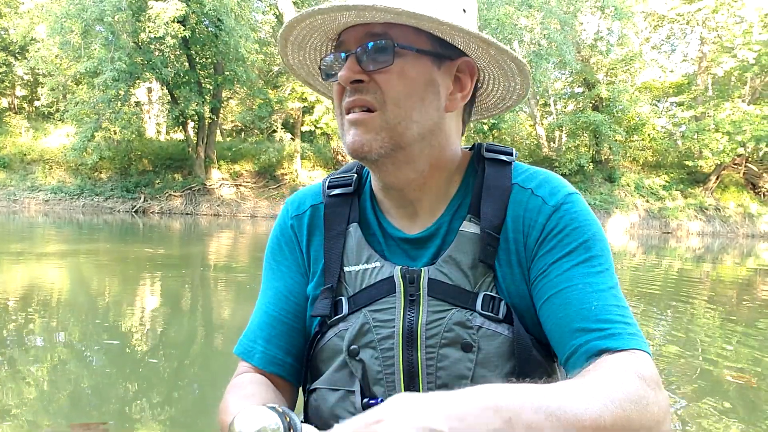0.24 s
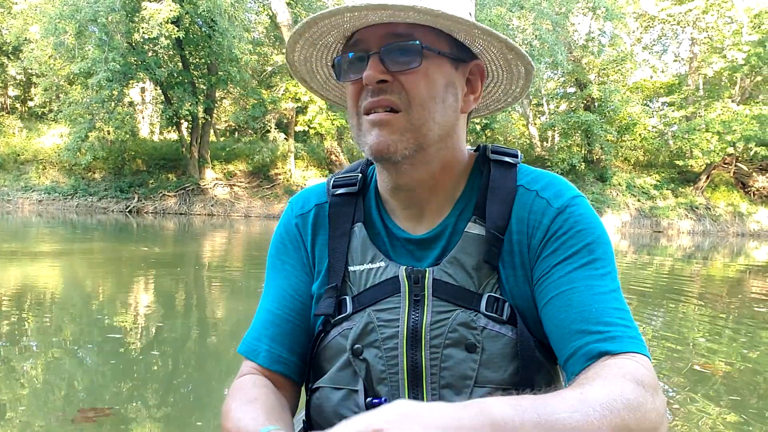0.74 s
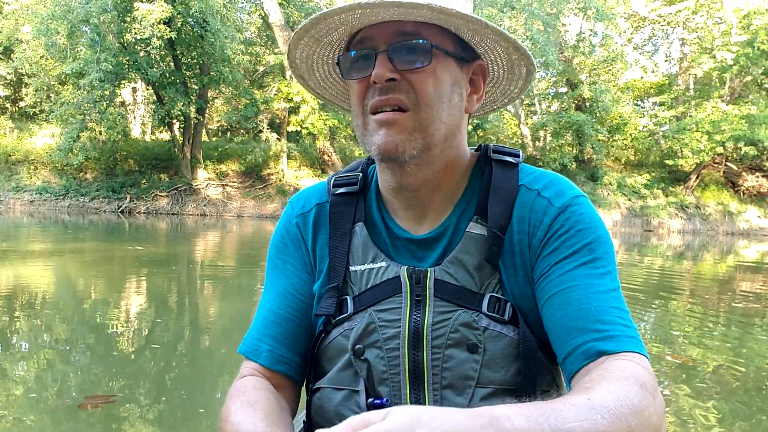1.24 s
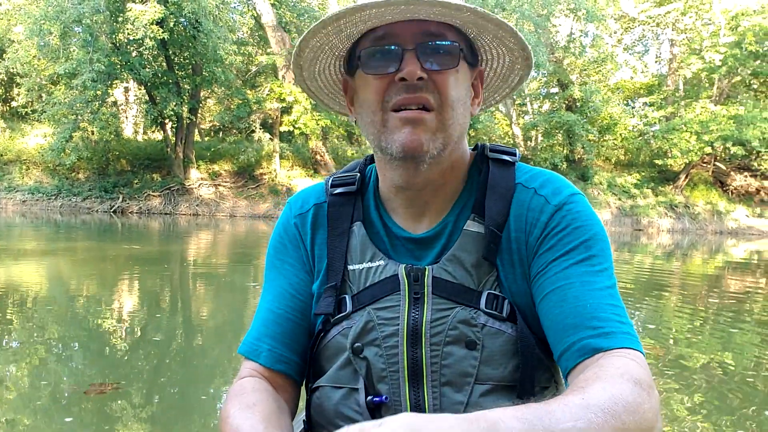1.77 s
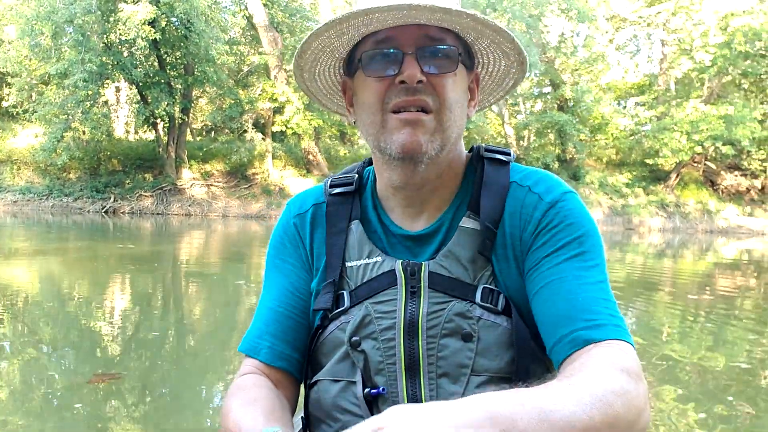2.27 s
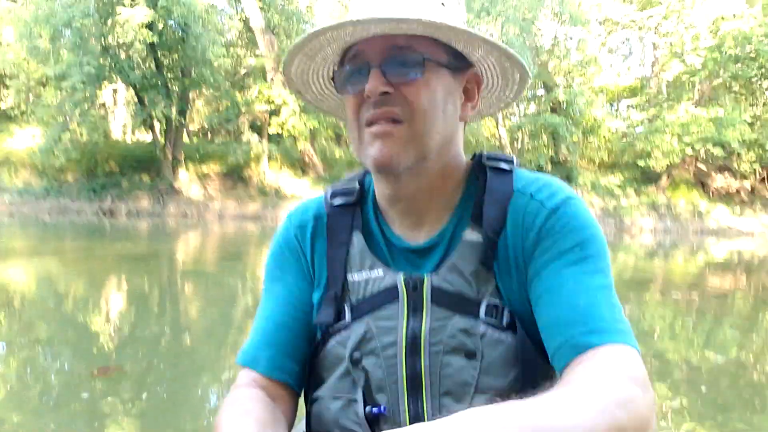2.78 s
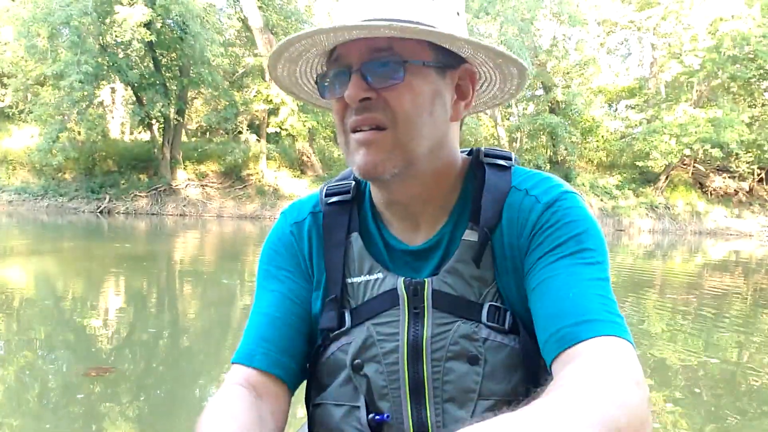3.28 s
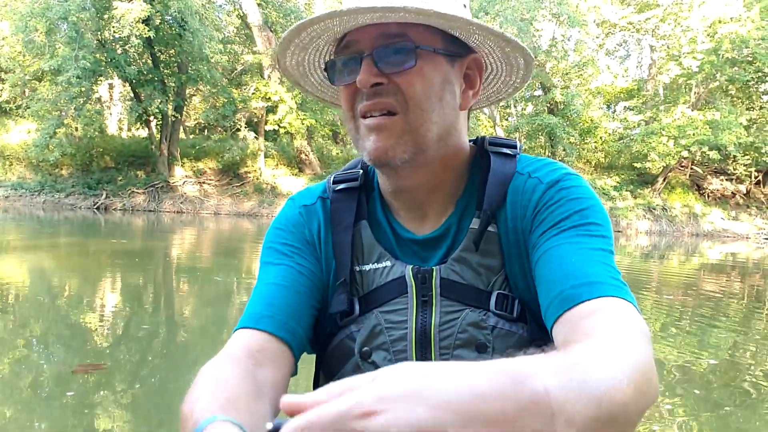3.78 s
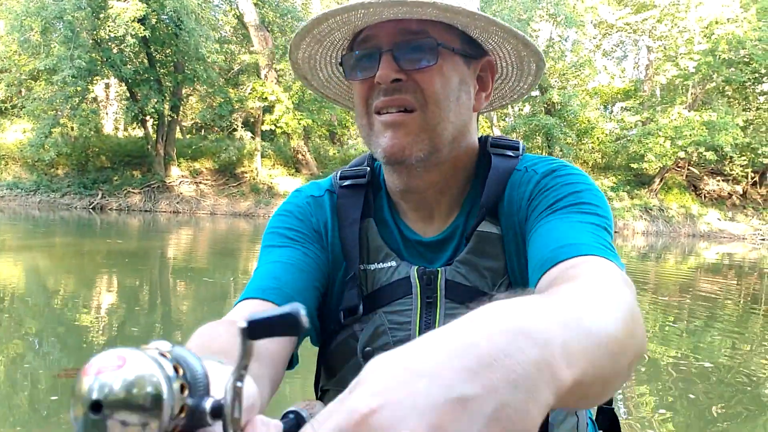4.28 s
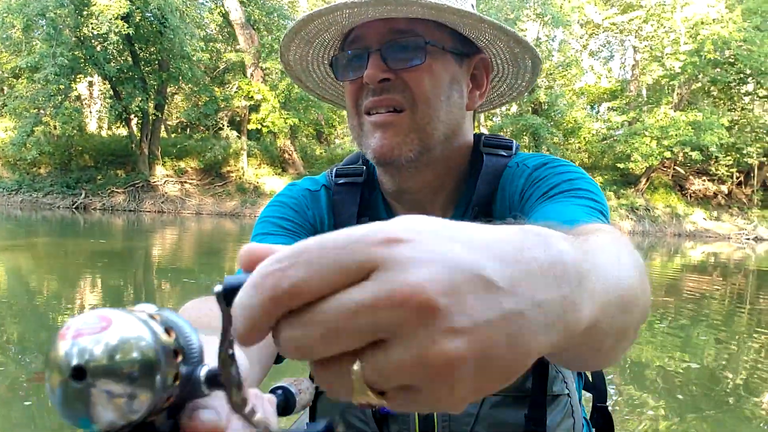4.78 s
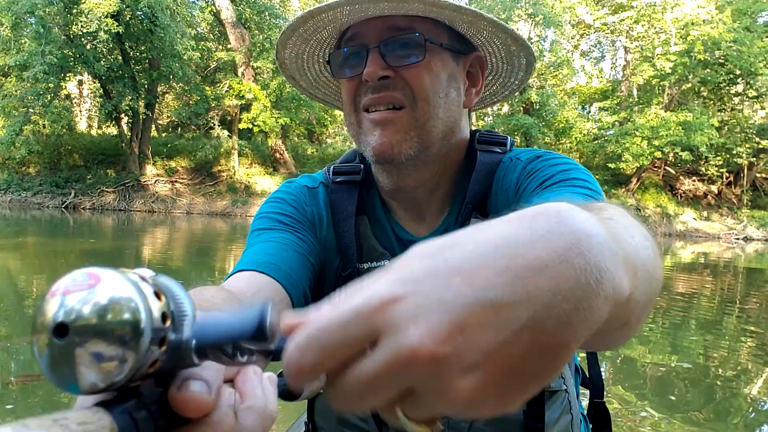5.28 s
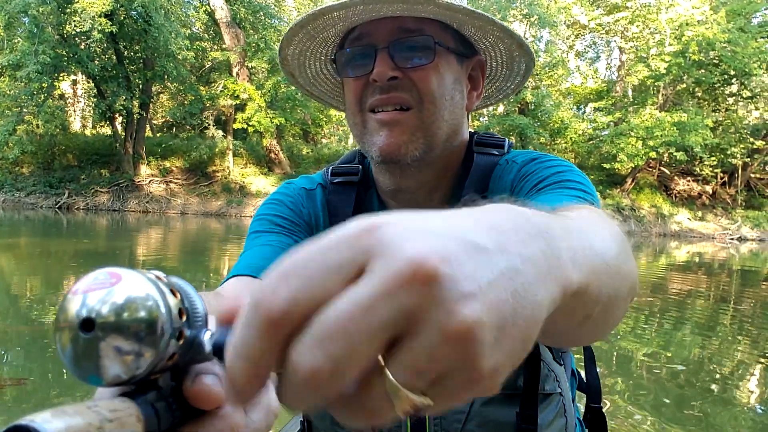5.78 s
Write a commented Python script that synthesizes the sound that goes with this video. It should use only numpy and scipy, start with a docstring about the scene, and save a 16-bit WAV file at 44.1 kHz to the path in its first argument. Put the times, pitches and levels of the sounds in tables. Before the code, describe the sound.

Outdoors on a quiet river, katydids tick and buzz very high and bright over a cricket band and low rumble. After nearly three seconds a plastic canoe hits the bank with a loud, deep hollow boom, then grinds, crackles and knocks for half a second. Softer knocks dwindle, and insects return to the fore with a barely audible reel. The small stereo camera rides on the hull.

```python
"""A muddy, rooty bank with tall grass: a plastic canoe runs aground, booms, grinds, knocks and settles.
Hull modes rung by blows, noise through those modes and a wavering low tone make the hull; bursts of noise
make twigs, gravel and scuffs, and a reel whirs and clunks faintly. Katydids tick and buzz in pulsed bright
noise on the right, and hiss farther off as a fluttering band; crickets hold a narrow band over a low outdoor
rumble. A small camera with two microphone ports rides on the hull."""
import sys
import numpy as np
from scipy import signal
from scipy.fft import rfft, irfft, next_fast_len
from scipy.io import wavfile
from scipy.ndimage import uniform_filter1d, minimum_filter1d, map_coordinates

SR = 44100
rng = np.random.default_rng(int(sys.argv[2]) if len(sys.argv) > 2 else 0)


def master_out(mix):
    """Clip the mix to full scale and print it as 16-bit PCM to the path in sys.argv[1]."""
    frames = np.transpose(np.atleast_2d(mix))
    ceiling = np.clip(frames, -1, 1)
    pcm = np.round(ceiling * 32767).astype(np.int16)
    wavfile.write(sys.argv[1], SR, pcm)


N = 265923

# modes of the plastic hull: (f/Hz, relative level/dB, nominal t60/s)
HULL_MODES = [(45.3, 0.5, 0.33), (61.5, 2, 0.53), (98.8, 2, 0.24), (129.6, -4.5, 0.19), (150, -1.5, 0.37),
              (190.8, 5, 0.12), (240, 2, 0.045), (294.4, 4, 0.04), (345, 1, 0.045), (432, -7, 0.073),
              (508.4, -4.5, 0.051), (569.6, -5, 0.038), (666, -8, 0.033), (780, -11.5, 0.041),
              (933, -16, 0.054), (1136, -8, 0.022), (1507, -8.5, 0.024), (1780, -11.5, 0.037),
              (2320, -17.5, 0.018)]


def amp(db):
    """dB to gain."""
    return 10 ** (np.asarray(db) / 20)


def unit(x):
    """Scaled to rms 1."""
    return x / np.sqrt(np.mean(x ** 2) + 1e-20)


def along(points, hz):
    """Values of (f/Hz, value) points, read along a log frequency axis."""
    f, v = np.transpose(points)
    return np.interp(np.log(hz + 1), np.log(f + 1), v)


def curves(rows):
    """One value per sample for each column after the time."""
    s, *cols = np.transpose(rows)
    return [np.interp(np.arange(N) / SR, s, c) for c in cols]


def sides(pan_db):
    """Left and right gains; positive pan leans left."""
    return amp(np.array([pan_db / 2, -pan_db / 2]))


def wobble(rate):
    """A smooth random curve, rate knots a second."""
    knots = rng.standard_normal(int(N * rate / SR) + 4)
    return map_coordinates(knots, [np.arange(N) * rate / SR])


def filtered(x, response):
    """x shaped by a response of frequency."""
    m = next_fast_len(x.shape[-1] + 8192)
    spectrum = rfft(x, m) * response(np.fft.rfftfreq(m, 1 / SR))
    return irfft(spectrum, m)[..., :x.shape[-1]]


def rush(gain, grain_db=0):
    """Stereo noise of rms 1, alike in the bass; grain_db makes it crackle."""
    # left-right likeness: (f/Hz, correlation)
    likeness = [(60, 0.9), (130, 0.78), (290, 0.5), (640, 0.037), (1400, 0.00475)]
    pair = rng.standard_normal((2, N)) * amp(grain_db * wobble(700))
    turn = lambda hz: np.arccos(np.clip(along(likeness, hz), -1, 1)) / 2
    mid, side = filtered(pair, lambda hz: gain(hz) * [np.cos(turn(hz)), np.sin(turn(hz))])
    return unit(np.array([mid + side, mid - side]))


def shaped(points):
    """Gain of a spectrum table."""
    return lambda hz: amp(along(points, hz))


def add(out, s, sound):
    """Mix a short stereo sound in at time s."""
    part = out[:, round(s * SR):][:, :sound.shape[1]]
    part += sound[:, :part.shape[1]]


def air():
    """Distant rumble and leaf hiss: broad noise weighted to the bass, its level drifting."""
    # outdoor floor: (f/Hz, relative level per Hz/dB)
    floor = [(15, -43), (25, -16), (86, 1), (119, -4), (136, -17.5), (211, -9.5), (253, -13.5), (553, -21),
             (1180, -28.5), (3970, -37), (6000, -35.5), (7800, -51), (13200, -120)]
    # its loudness: (t/s, level/dB)
    loudness = [(0, -55.5), (1.2, -56.5), (2.6, -54), (6.03, -55.5)]
    level_db, = curves(loudness)
    return amp(level_db + 1.3 * wobble(9)) * rush(shaped(floor))


def crickets():
    """Many far trills blur into one fluttering band of noise."""
    # loudness: (t/s, level/dB)
    loudness = [(0, -40), (2.69, -40), (3.31, -42), (4.65, -41.5), (5.59, -40)]
    # trill band: (f/Hz, relative level per Hz/dB)
    trill = [(3410, -62), (5800, -23.5), (5910, -79), (6430, -16.5), (6650, -6), (7310, 4.5), (7840, 4.5),
             (8500, -7.5), (9000, -40), (11700, -38), (19800, -120)]
    level_db, = curves(loudness)
    flutter_db = 0.84 * wobble(11) + 0.77 * wobble(90)
    return amp(level_db + flutter_db) * sides(0.225)[:, None] * rush(shaped(trill))


def far_katydids():
    """A distant chorus: bright noise whose level flutters separately on each side."""
    # loudness and place: (t/s, level/dB, pan/dB)
    chorus = [(0, -30, 2.5), (.5, -33, 2), (.86, -29.5, 0), (1.65, -29, -0.5), (1.86, -34.5, 3.5),
              (2.35, -34.5, 5), (2.82, -30.5, 0), (3.06, -34, 2), (3.58, -31, .5), (4.4, -33.5, -1),
              (4.73, -37.5, 5.5), (5.73, -28.5, 1.5), (6.03, -31, 7)]
    # chorus band: (f/Hz, relative level per Hz/dB)
    far_band = [(5180, -44), (8800, -12), (10300, -6.5), (11800, 3), (12800, 3.5), (14800, 6), (15700, 3.5),
                (16000, -5)]
    level_db, pan_db = curves(chorus)
    left_db = 2.0 * wobble(60) + 0.35 * wobble(3.2)
    right_db = 0.51 * wobble(71) + 0.9 * wobble(36)
    flutter = amp(np.array([left_db, right_db]))
    return amp(level_db) * sides(pan_db) * flutter * rush(shaped(far_band))


def katydid_buzzes():
    """A buzz is a run of wing strokes, each a pulse of grainy noise coloured by the wing's resonances."""
    # (full from t/s, silent at t/s, strokes per s, change of rate/s^-2, first level/dB, last level/dB)
    buzzes = [(.563, 1.742, 45.45, -1.35, -33, -29.5), (3.309, 4.522, 45.3, -1.5, -38, -32.5),
              (5.391, 6.1, 41.6, 3, -35, -30.5)]
    # broad wing colour: (f/Hz, relative level per Hz/dB)
    wing_band = [(5590, -69.5), (9500, -23), (10000, -13.5), (11000, -3.5), (12300, 2.5), (13400, 6.5),
                 (14300, 5.5), (15200, -5), (16000, -27)]
    # resonances of the near wing: (f/Hz, half width/Hz, boost over the broad colour/dB)
    mirror = [(12800, 150, 3), (13350, 150, 3), (13850, 150, 4), (14630, 150, 4), (15040, 150, 4)]
    rise_s, fall_s = 0.066, 0.013  # the rise comes ahead of the first time
    strokes, effort = np.zeros((2, N))
    for start, end, rate, change, first_db, last_db in buzzes:
        u = np.arange(N) / SR - start
        on = np.clip(np.minimum(1 + u / rise_s, (end - start - u) / fall_s), 0, 1)
        strokes += (on > 0) * (rate * u + change * u ** 2 / 2)
        effort += on * amp(first_db + (last_db - first_db) * u / (end - start))
    beat = np.exp(2.1 * (np.cos(2 * np.pi * strokes) - 1)) * amp(0.8 * wobble(44))
    # the right port faces the singer; the left has more of a steady blur between strokes
    near = beat * [[0.95], [2.05]] + [[0.42], [0.25]]

    def wing(f):
        peaks_db = sum(db / (1 + ((f - c) / w) ** 2) for c, w, db in mirror)
        return amp(along(wing_band, f) + peaks_db)

    return effort * near * rush(wing, grain_db=1.0)


def katydid_ticks():
    """Single wing flicks: short bursts of band noise, each with a fading tail."""
    # (t/s, approximate peak/dB, centre f/Hz, pan/dB)
    ticks = [(.0044, -23, 15200, -12), (.0388, -17.5, 15100, -7), (0.127, -16.5, 13700, 0),
             (.1855, -18, 14100, -4), (0.218, -17.5, 14800, -1), (0.2635, -15, 14400, -2.5),
             (.341, -13.5, 14900, -2.5), (.415, -19, 13700, -5.5), (0.518, -17.5, 14700, 2),
             (0.7376, -21.5, 14200, -9), (.808, -18, 14800, -3.5), (.958, -12.5, 15700, -0.5),
             (1.091, -22, 13800, 2), (1.225, -14, 14900, -1.5), (2.009, -18.5, 14700, -2),
             (2.166, -20.5, 15100, -4), (2.2394, -28.5, 13800, -2), (2.31, -20, 15300, 5),
             (2.38, -29, 12900, 0), (2.4, -22, 15600, 0), (2.583, -17, 15400, -2.5),
             (2.6743, -19, 14700, -6), (2.7103, -24, 15000, -10), (2.847, -19, 14300, 0),
             (3.01, -23, 14650, -2), (3.079, -22, 13700, -1), (3.163, -22, 14100, -4),
             (4.748, -20, 13300, 0), (4.8702, -18, 13500, -1), (4.987, -19.5, 13300, -1),
             (5.077, -19, 13500, -2), (5.158, -16, 13600, 1), (5.231, -18, 13580, -2),
             (5.4067, -21, 13200, -6), (5.598, -17, 13610, -5), (5.675, -15.5, 14000, -5),
             (5.754, -20, 14200, -11.5), (5.8371, -13.5, 15300, -3)]
    tick_s = 0.015
    out, t = np.zeros((2, N)), np.arange(SR // 20) / SR
    tail = 0.5 * amp(-60 * t / 0.17)
    stroke = np.clip(t / 0.0038, 0, 1) * (np.clip((tick_s - t) / 0.0028, 0, 1) + tail)
    for s, db, centre_hz, pan_db in ticks:
        band = lambda f: 1 / (1 + (abs(f - centre_hz) / 2300) ** 6)
        teeth = filtered(rng.standard_normal((2, len(t))), band)
        # such noise peaks about three times above its rms; the burst starts 4 ms ahead of its mark
        add(out, max(s - 0.004, 0), amp(db) * sides(pan_db)[:, None] * stroke * unit(teeth) / 3)
    return out


def reel():
    """A cranked fishing reel whirs: gear noise in one small resonance, loudest once a turn."""
    from_s, to_s, turn_s = 4.53, 5.81, 0.308
    mean_db, swing_db = -70, 4
    t = np.arange(N) / SR
    load = np.sin(np.pi * (t - from_s) / turn_s) ** 2
    cranked = (t > from_s) * (t < to_s)
    level = amp(mean_db - swing_db * (0.5 - load) + 2.21 * wobble(13)) * cranked
    return level * rush(lambda f: 1 / (1 + ((f - 970) / 90) ** 2))


def ringing(lo_hz, hi_hz):
    """Response of the hull modes between two pitches to a random force."""
    def response(f):
        total = 0
        for k, (c, db, t60) in enumerate(HULL_MODES):
            if lo_hz < c < hi_hz:
                damping = 1j * f * 6 / t60
                total = total + (-1) ** k * amp(db) * damping / (c * c - f * f + damping)
        return total
    return response


def crackle(events, top_db, grain_db, lo_hz, tilt):
    """Bursts of grit: a thud through the skin's modes, a shorter crack through the air, a longer top edge."""
    half_octaves, skin_db = 0.69, 9.5  # half width of a crack; gain of the skin's modes
    skin, out, t = np.zeros((2, N)), np.zeros((2, N)), np.arange(SR // 3) / SR
    top = signal.butter(2, [7000, 22000], "band", fs=SR)
    for s, db, thud_db, pan_db, centre_hz, t60, rise in events:
        edges_hz = centre_hz * 2. ** np.array([-half_octaves, half_octaves])
        crack = signal.butter(2, edges_hz, "band", fs=SR)
        steps = np.repeat(rng.standard_normal(len(t) // 60 + 1), 60)[:len(t)]
        burst = amp(grain_db * steps) * (1 - np.exp(-(t / rise) ** 2))
        thud_noise, crack_noise, top_noise = rng.standard_normal((3, 2, len(t))) * burst
        fall_db = -60 * np.maximum(t - rise, 0) / t60
        gain = amp(db) * sides(pan_db)[:, None]
        thud = thud_noise * amp(fall_db + thud_db + skin_db) * (1 - np.exp(-t / 0.00066))
        add(skin, s, gain * thud)
        snap = signal.lfilter(*crack, crack_noise * amp(2.45 * fall_db))
        edge = signal.lfilter(*top, top_noise * amp(0.63 * fall_db + top_db))
        add(out, s, gain * (snap + edge))
    return out + filtered(skin, lambda f: ringing(lo_hz, 2500)(f) * ((f + 20) / 1000) ** tilt)


def scuffs():
    """Soft scuffs of hull, rod and sleeve: slower bursts of grit with a dull top."""
    # (t/s, crack level/dB, thud share/dB, pan/dB, thud t60/s)
    rubs = [(.045, -64, 18.5, 3, .15), (.287, -69, 17, 9, 0.14), (3.405, -45, 19, 1, 0.14),
            (3.435, -40, 16, 6, 0.096), (3.501, -39, 4, 4, 0.13), (3.64, -67, 16, 3, 0.22),
            (3.821, -45.5, 11, 3, 0.062), (4.03, -56, 18.5, -1, 0.13), (4.165, -57, 9, 4, 0.071),
            (4.252, -58, 15.5, 0, 0.12), (4.652, -51, -3, 5, 0.17), (4.94, -46, 3.5, 1, 0.18),
            (4.965, -47, -1, 5, 0.22), (5.019, -43.5, -6, 6, 0.09), (5.11, -59, 1, 12, 0.32),
            (5.28, -59, 12, 13, 0.097)]
    centre_hz, rise_share = 4270, 0.13  # rise time over t60
    events = [(*row, centre_hz, t60, rise_share * t60) for *row, t60 in rubs]
    return crackle(events, top_db=-33, grain_db=2, lo_hz=230, tilt=-0.35)


def snaps():
    """Twigs, gravel and loose tackle against the hull: quick, bright bursts of grit."""
    # (t/s, crack level/dB, thud share/dB, pan/dB, crack centre f/Hz)
    hits = [(2.668, -22.5, -13, 0, 6000), (2.6888, -19.5, 4.5, 8, 2970), (2.7116, -21.5, 3, 9, 6200),
            (2.721, -14.5, 7.5, -6.5, 3500), (2.7388, -18.5, -5, 4.5, 5000), (2.7509, -18.5, 10, 3.5, 3000),
            (2.7562, -32, -10, -3, 4500), (2.805, -21.5, 4.5, 5.5, 5500), (2.825, -21.5, 13, -3, 3200),
            (2.8376, -26.5, 14.5, -2, 2580), (2.844, -26, 15, 5, 2600), (2.852, -33, -15, 3, 4300),
            (2.8979, -28, 6.5, 8, 3600), (2.9031, -16, 13, 2, 4500), (2.92, -32, 9, 7, 6600),
            (2.9223, -8.5, 1, -2.5, 4500), (2.94, -26, -13.5, 3, 4500), (2.944, -24, -16.5, 11, 5200),
            (2.965, -25, -2.5, 3, 3000), (2.9873, -16.5, 13.5, 3, 3250), (2.994, -33, 0, 2, 2800),
            (3.03, -25.5, 1, 12, 4230), (3.057, -28, 6, 6, 6100), (3.0646, -32, 16, 4, 2600),
            (3.0847, -37.5, -4, 10, 4600), (3.1116, -32.5, 17.5, 9, 2600), (3.122, -37, -4, 7, 5300),
            (3.168, -43, 12, 6, 2600), (3.1826, -46.5, 20, 9, 2590), (3.2243, -45, 21, 0, 2600),
            (3.448, -39, 11, -1, 4800), (3.453, -38.5, 20, 4, 3000), (3.5022, -32.5, 7, -11, 2800),
            (3.826, -69, 1, -1, 2630), (4.9696, -41.5, 6.5, 10, 3500), (5.029, -55, -8, 2, 4030),
            (5.131, -45.5, -12, 10, 5700)]
    t60_s, rise_s = 0.031, 0.00066
    events = [(*row, t60_s, rise_s) for row in hits]
    return crackle(events, top_db=-5.5, grain_db=2.5, lo_hz=550, tilt=0.33)


def flexing():
    """The lowest bending of the hull: a wavering tone with a share of rumble in the low modes."""
    # pitch set by how much of the hull lies on the mud: (t/s, f/Hz, level/dB)
    bends = [(2.645, 81.15, -82), (2.655, 81.2, -19.5), (2.685, 78.4, -8), (2.721, 57.2, -16.5),
             (2.76, 56.8, -13.5), (2.799, 75.26, -18), (2.94, 79.9, -21.5), (3, 66.6, -22.5),
             (3.066, 81.4, -23.5), (3.157, 69.6, -26.5), (3.3, 66.7, -33.5), (3.45, 80, -36.5),
             (3.545, 80, -30.5), (3.62, 79.5, -35.5), (3.8, 79.9, -43.5), (3.86, 80.3, -41),
             (3.939, 79.8, -45), (4, 89.2, -74), (4.086, 91, -42), (4.155, 92.4, -47.5), (4.25, 92.4, -72),
             (4.36, 93.4, -47.5), (4.42, 94, -50), (4.546, 93.3, -59), (4.658, 96.1, -47), (4.8, 96.1, -60),
             (5.05, 91.8, -65), (5.3, 92.1, -55.5), (6.03, 90.1, -65)]
    pitch_hz, level_db = curves(bends)
    moving = np.arange(N) / SR > bends[0][0]
    turn = 2 * np.pi * np.cumsum(pitch_hz) / SR + 0.98 * wobble(25)
    drift = 0.52 * np.array([wobble(60), wobble(7.6)])
    tone = np.sqrt(2) * np.sin(turn + np.array([[0.15], [-0.15]]) + drift)
    rumble = 0.73 * rush(ringing(20, 135))
    return moving * amp(level_db + 2.5 * wobble(22.104)) * unit(tone + rumble)


def grinding():
    """The lumpy bank rattles the panels' modes while grit scrapes the skin as crackling noise."""
    # the hull slides on the bank, then shifts faintly in the mud:
    # (t/s, panel rattle level before the port mix/dB, grit level/dB)
    slide = [(2.65, -70, -77), (2.664, -25, -46), (2.675, -37, -31.5), (2.71, -22.5, -29),
             (2.765, -33, -28), (2.785, -39, -39.5), (2.812, -29, -30), (2.83, -19, -29),
             (2.86, -25, -36.5), (2.885, -27, -41), (2.915, -15.5, -22.5), (2.96, -35, -43.5),
             (2.99, -18.5, -26), (3.02, -32, -40.5), (3.08, -29, -40), (3.12, -44.5, -45.5),
             (3.16, -34, -54), (3.24, -34, -53), (3.286, -45, -83), (3.4, -34, -66), (3.45, -33, -40.5),
             (3.49, -31.5, -46.5), (3.55, -35, -51), (3.58, -41, -66), (3.68, -43.5, -67),
             (3.8, -49.5, -75), (3.97, -61, -68), (4.1, -50.5, -67.5), (4.22, -75, -65.5),
             (4.33, -58.5, -68), (4.55, -69, -80), (5.2, -77, -65), (5.35, -58.5, -73), (5.55, -68, -71.5),
             (6.03, -63, -67.5)]
    # scrape colour: (f/Hz, relative level per Hz/dB)
    grit_band = [(350, -36), (600, -3), (711, 5), (949, 2.5), (1110, 0.5), (1490, -1.5), (2420, -3),
                 (6500, -11), (8450, -42), (14300, -120)]
    onset = (slide[0][0] - 0.004, -120, -120)
    panel_db, grit_db = curves([onset] + list(slide))
    panels = amp(panel_db + 2.66 * wobble(45)) * rush(ringing(135, 1000))
    panels = 0.69 * (panels + 0.49 * panels.mean(0))  # a shared part reaches both ports alike
    grit = amp(grit_db + 1.8 * wobble(90)) * rush(shaped(grit_band), grain_db=3)
    return panels + grit


def knocks():
    """Each knock rings the modes near its pitch at new strengths; softer knocks ring longer."""
    # blows on the hull; the last faint ones, near 940 Hz, are clunks of the reel:
    # (t/s, peak before pan/dB, favoured f/Hz, pan/dB)
    strikes = [(0.07, -50, 202, 3), (0.302, -55.5, 240, -3), (2.655, -5, 114, -5.5), (2.661, -15, 193, 1),
               (2.667, -23.5, 412, -1), (2.685, -21, 200, 5), (2.693, -23.5, 700, 2),
               (2.709, -13.5, 195, 1), (2.727, -19, 210, -2), (2.791, -15.5, 174, -3),
               (2.876, -19, 189, -2), (2.95, -18, 200, 5), (2.684, -15.5, 328, -6), (2.705, -14, 310, 4),
               (2.749, -21, 1450, 7), (2.751, -7, 399, 2.5), (2.804, -22.5, 885, 0), (2.824, -15, 800, 4),
               (2.827, -17, 560, 0), (2.837, -18, 543, 1), (2.845, -8.5, 270, 4), (2.853, -17, 523, 3),
               (2.862, -23, 510, 0), (2.883, -23, 500, 4), (2.902, -20.5, 1500, 11), (2.908, -20, 780, 7),
               (2.916, -27, 796, 6), (2.925, -21.5, 430, 3), (2.989, -10, 323, 2.5), (3.021, -17, 178, 3),
               (3.049, -37, 795, 4), (3.111, -30, 770, -4), (3.116, -11.5, 300, 2), (3.184, -37.5, 880, -1),
               (3.186, -26.5, 196.6, 0), (3.209, -24.5, 252, 7), (3.2264, -14, 287, 5.5),
               (3.324, -19, 292, 4), (3.339, -23, 256, 0), (3.372, -26, 192.5, -1), (3.444, -28, 1270, 5),
               (3.447, -28, 1750, 13), (3.452, -35, 1450, 1), (3.459, -33, 1150, 9), (3.531, -32.5, 263, 3),
               (3.657, -33.5, 201, 2), (3.847, -33, 193.6, 2.5), (4.05, -50, 597, 2), (4.076, -37, 190, 1),
               (4.262, -57, 605, 9), (4.289, -42.5, 181, 1), (4.575, -57, 960, 7), (4.655, -52.5, 930, 5),
               (4.951, -50, 910, 3), (5.113, -53, 973, 10), (5.265, -53.5, 940, 9)]
    ring_share, ring_gain_per_db = 0.094, 0.07  # scale of t60 at 0 dB; increase for each dB softer
    rise_s, rise_hz = 0.0055, 300  # rise of a knock at this pitch; higher ones are quicker
    choice_db = 85  # loss of a mode an octave away from the favoured pitch
    out, t = np.zeros((2, N)), np.arange(SR // 2) / SR
    hz, level, t60 = np.transpose(HULL_MODES)[:, :, None]
    for s, db, pitch_hz, pan_db in strikes:
        share = ring_share - ring_gain_per_db * db
        rise = rise_s * np.sqrt(rise_hz / pitch_hz)
        near_db = -choice_db * np.log2(hz / pitch_hz) ** 2
        decay = amp(level + near_db - 60 * t / (share * t60))
        modes = decay * np.sin(2 * np.pi * hz * t) * (1 - np.exp(-(t / rise) ** 2))
        # random strengths, partly shared by the two sides
        strengths = amp(rng.normal(0, 2.9, len(hz)) + rng.normal(0, 4.8, (2, len(hz))))
        ring = strengths @ modes
        add(out, s, amp(db) * sides(pan_db)[:, None] * ring / np.abs(ring).max())
    return out


def echo(x):
    """Hull and bank answer with a noise tail in which each frequency dies at its own speed."""
    # (f/Hz, t60/s)
    bank = [(100, 0.24), (1000, 0.079), (12000, 0.084)]
    hz, t, z = signal.stft(rng.standard_normal((2, SR // 3)), SR, nperseg=256)
    fading = z * amp(-60 * t / along(bank, hz)[:, None])
    tail = signal.istft(fading, SR, nperseg=256)[1]
    return signal.fftconvolve(x, tail / np.linalg.norm(tail[0]), axes=1)[:, :N]


def scene():
    """All sources at the camera."""
    struck = knocks()
    bits = snaps() + scuffs()
    contact = flexing() + grinding() + struck + bits + echo(amp(-18) * struck + amp(-8) * bits)
    insects = far_katydids() + katydid_buzzes() + katydid_ticks() + crickets()
    return air() + insects + reel() + contact


def record(dry):
    """The camera thins the deepest bass, a limiter holds the loudest peaks, and a band limit cuts the top."""
    top_hz, ceiling = 15750, 0.87
    thin = filtered(dry, lambda hz: 1 / np.sqrt(1 + (36 / (hz + 1)) ** 4))
    need = np.minimum(1, ceiling / (np.abs(thin).max(0) + 1e-9))
    held = thin * uniform_filter1d(minimum_filter1d(need, size=600), size=300)
    return filtered(held, lambda hz: hz < top_hz)


dry = scene()
out = record(dry)
master_out(out)
```